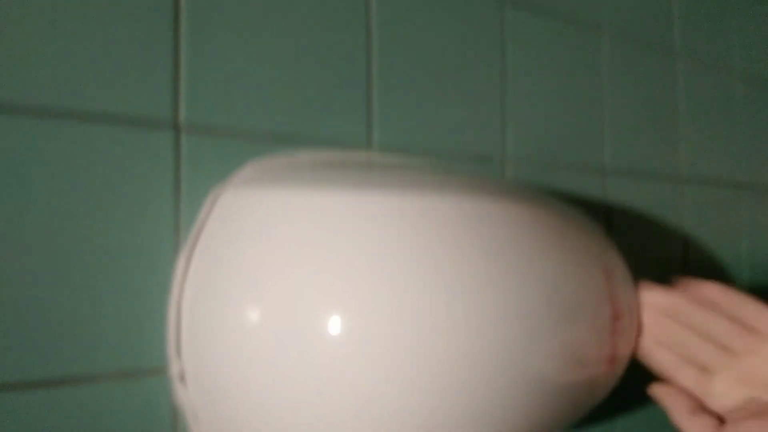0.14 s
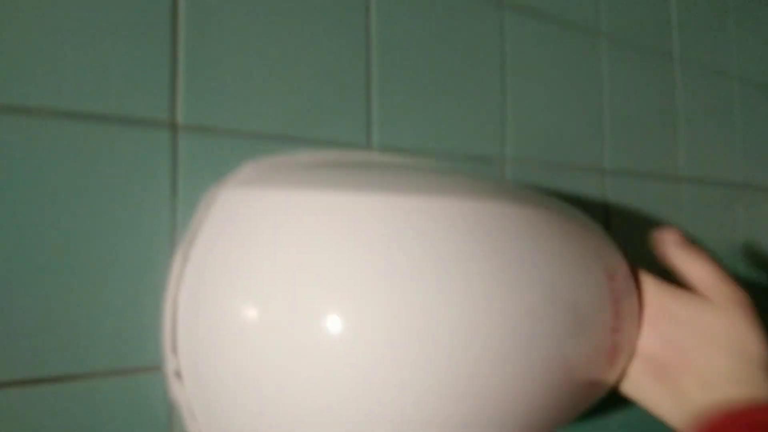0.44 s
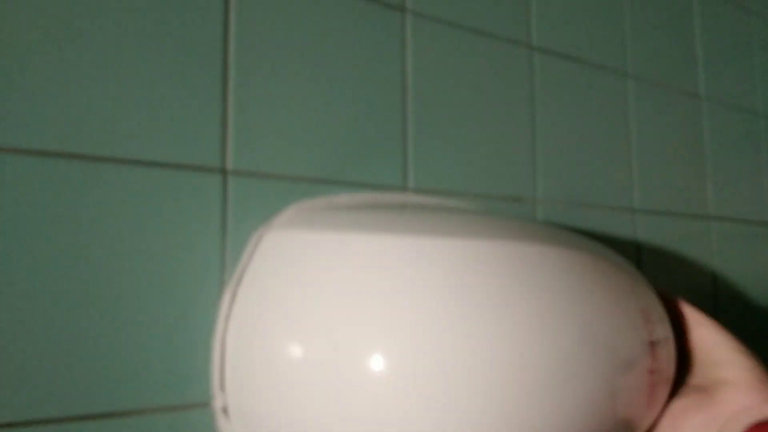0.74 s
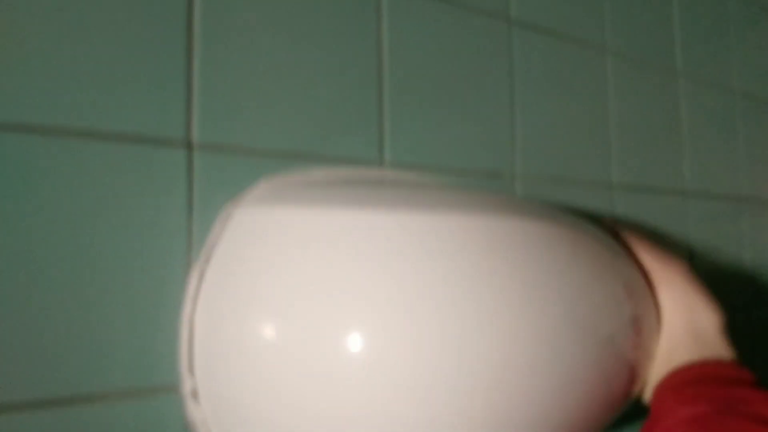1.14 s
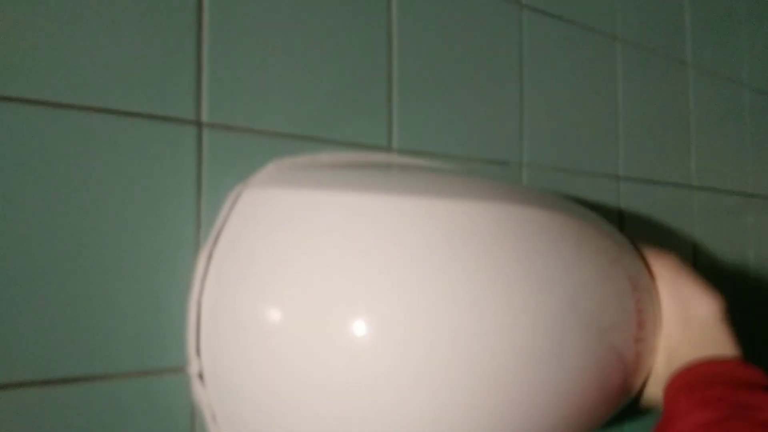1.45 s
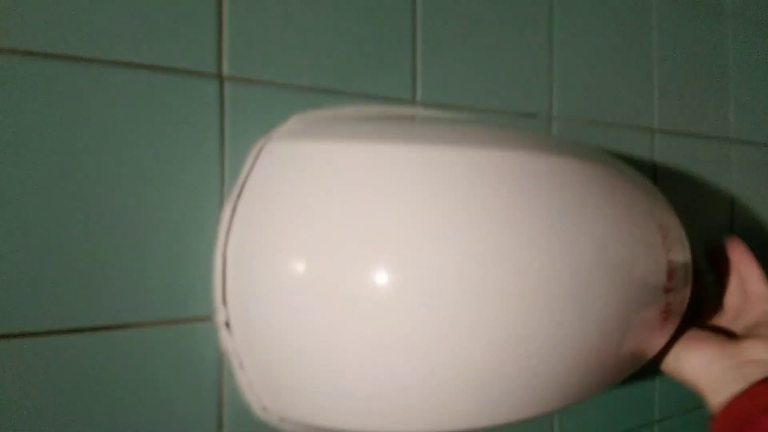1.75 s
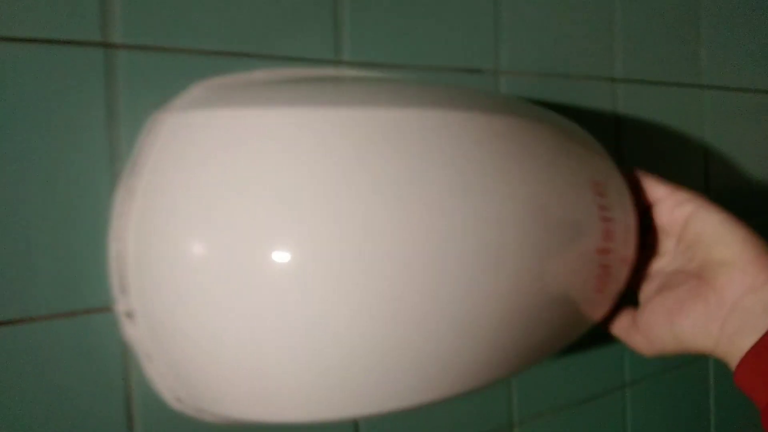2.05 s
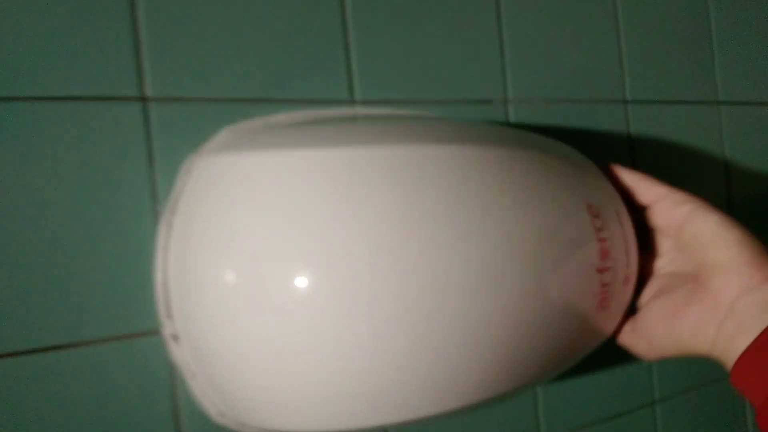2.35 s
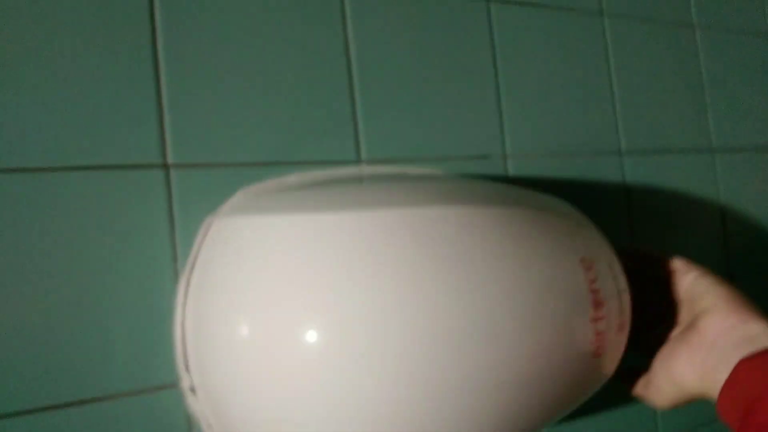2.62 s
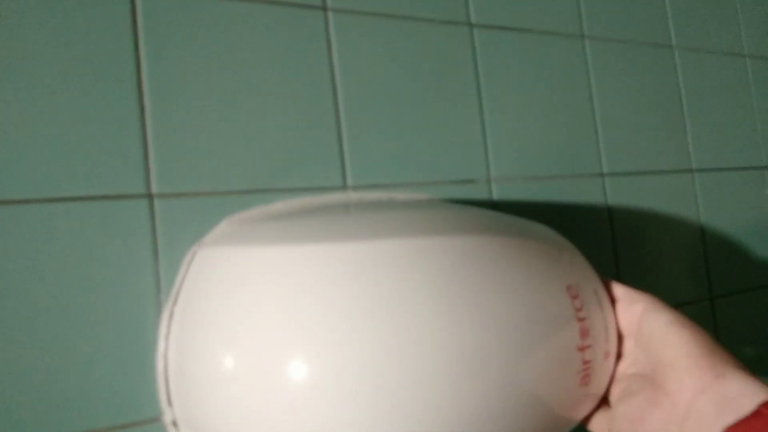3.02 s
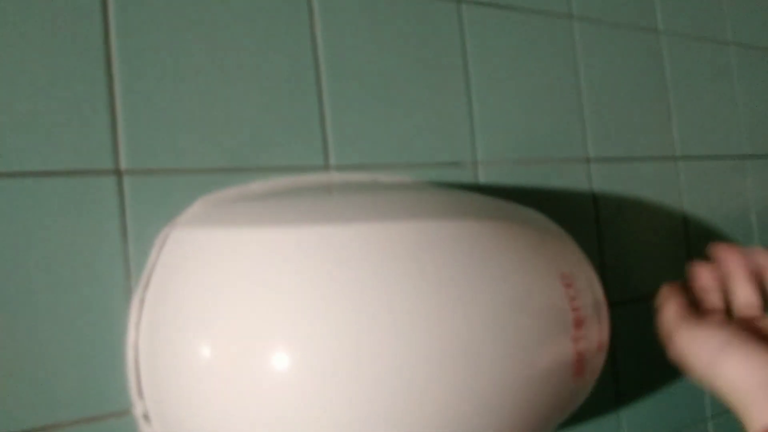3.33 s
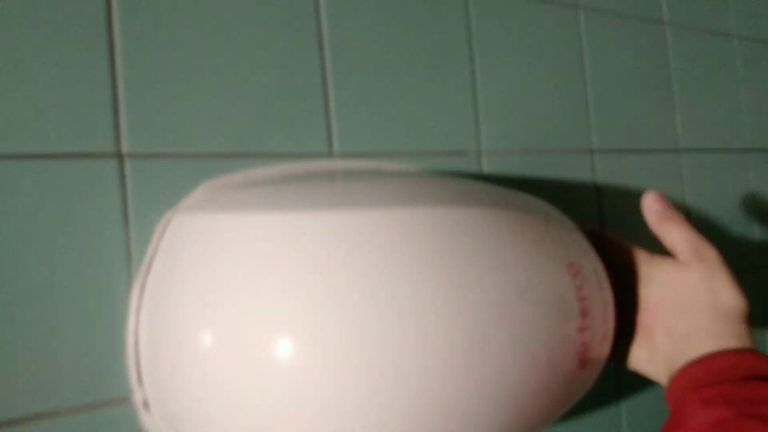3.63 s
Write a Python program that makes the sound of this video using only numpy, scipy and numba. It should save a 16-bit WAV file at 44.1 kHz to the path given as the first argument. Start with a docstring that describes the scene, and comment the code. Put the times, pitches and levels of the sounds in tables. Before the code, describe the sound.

Hand dryer already at full speed, heard close up in a reverberant tiled room. Air hisses sharply on skin, drops back, then roars in the palm, over a steady piercing whine and occasional gust bumps.

```python
"""Hand dryer in a tiled washroom

A high-speed hand dryer runs while a hand moves about in its jet.
The jet is shaped noise that rushes throughout; the motor is a stack of whining tones on one shaft speed.
Near the nozzle the air hisses on the skin (bright noise), further off it roars in the palm (resonant noise).
Deflected gusts buffet the microphone, two low tones boom at the start and ring out,
and the recorder rounds the loudest peaks."""
import sys
import numpy as np
from scipy import signal
from scipy.fft import rfft, irfft
from scipy.io import wavfile
from scipy.ndimage import uniform_filter1d
from numba import njit

SR = 44100
rng = np.random.default_rng(int(sys.argv[2]) if len(sys.argv) > 2 else 0)


def waveform_to_disk(signal):
    """Save audio, clipped to [-1, 1], as 16-bit WAV at the path in sys.argv[1]."""
    frames = np.transpose(np.atleast_2d(signal))
    scaled = np.clip(frames, -1, 1) * 32767
    samples = np.round(scaled).astype(np.int16)
    wavfile.write(sys.argv[1], SR, samples)


N = 166698  # samples


def undb(db):
    """Decibels to gain."""
    return 10 ** (np.asarray(db) / 20)


def unit(x):
    """Scale to rms 1."""
    return x / np.sqrt(np.mean(x ** 2))


def curve(rows, axis=1):
    """One column of a table, joined by straight lines in time."""
    rows = np.array(rows)
    return np.interp(np.arange(N) / SR, rows[:, 0], rows[:, axis])


def walk(rate):
    """Smooth random motion of rms 1, from about `rate` fresh values per second."""
    hold = int(SR / rate)
    steps = np.repeat(rng.standard_normal(N // hold + 1), hold)
    smooth = uniform_filter1d(uniform_filter1d(steps, hold), hold)
    return unit(smooth[:N])


def noise(colour):
    """Noise of rms 1 whose spectrum joins the table's points over log frequency."""
    hz, db = np.array(colour).T
    f = np.maximum(np.fft.rfftfreq(N, 1 / SR), 1)
    gain = undb(np.interp(np.log(f), np.log(hz), db))
    return unit(irfft(rfft(rng.standard_normal(N)) * gain, N))


def contact(db, onset_db):
    """Gain of a hand sound: its power above the onset level, silent below it."""
    return np.sqrt(np.maximum(undb(db) ** 2 - undb(onset_db) ** 2, 0))


def jet():
    """The free jet: steady turbulence, heard as a broad rush."""
    # jet spectrum: pitch_hz [Hz], density_db [dB per Hz, relative]
    jet_colour = [(25, -3), (80, -10), (130, 0), (300, 1.5), (470, -4), (620, 0.5), (1000, -4), (1800, -10),
                  (4200, -8), (6800, -4), (8400, -8), (10000, -12), (13000, -20), (16000, -21)]
    return undb(-22) * noise(jet_colour)


def skin():
    """The jet breaks on the hand in a hiss that grows brighter as it grows louder."""
    # hiss on the skin: time_s [s], level_db [dB, before onset and trim]
    skin_hiss = [(0.0, -10.5), (0.09, -12), (0.19, -23), (0.31, -23), (0.37, -21.5), (0.41, -8.5),
                 (0.46, -8.5), (0.59, -13.5), (0.61, -17), (0.74, -23.5), (0.84, -13), (1.0, -24.5),
                 (1.07, -12.5), (1.13, -15), (1.17, -9), (1.35, -9.5), (1.36, -8), (1.66, -10.5),
                 (1.78, -22.5), (1.84, -22.5), (2.07, -17.5), (2.17, -23), (2.33, -23), (2.4, -13.5),
                 (2.44, -12.5), (2.54, -17.5), (2.58, -23), (2.81, -24.5), (2.94, -18.5), (2.99, -12.5),
                 (3.17, -11), (3.23, -20), (3.43, -23.5), (3.57, -24), (3.78, -18.5)]
    # hiss spectrum: pitch_hz [Hz], density_db [dB per Hz, relative]
    skin_colour = [(40, -13), (150, -13.5), (700, -12), (1500, -12.5), (2800, -11.5), (4300, -5),
                   (5600, -3), (6800, 0), (7800, -1), (9300, -8.5), (13000, -16), (16000, -19)]
    onset_db, trim_db = -25, 2.5
    sizzle_edge_hz, sizzle_db = 9000, 1
    force = contact(curve(skin_hiss), onset_db) * undb(trim_db)
    hiss = noise(skin_colour)
    high_pass = signal.butter(2, sizzle_edge_hz, "high", fs=SR, output="sos")
    sizzle = signal.sosfilt(high_pass, noise(skin_colour))
    # the sizzle grows with the square of the force
    return force * (hiss + sizzle * force * undb(sizzle_db))


@njit
def resonate(x, hz, k):
    """State-variable band-pass with a moving centre; k is its width as a share of the centre."""
    y, band, low = np.empty(len(x)), 0., 0.
    for i in range(len(x)):
        g = np.tan(np.pi * hz[i] / SR)
        v = (band + g * (x[i] - low)) / (1 + g * (g + k))
        band, low = 2 * v - band, low + 2 * g * v
        y[i] = k * v
    return y


def palm():
    """Turbulence in the hollow of the hand: one resonance moves with the hand, a lower one stays."""
    # roar in the palm: time_s [s], level_db [dB, before onset and trim], resonance_hz [Hz]
    palm_roar = [(0.0, -18.5, 2100), (0.13, -27.5, 2570), (0.22, -27, 1260), (0.26, -29.5, 1720),
                 (0.33, -27, 1220), (0.4, -15.5, 1830), (0.45, -28, 2890), (0.59, -19.5, 2120),
                 (0.73, -22.5, 1140), (0.85, -13.5, 2800), (0.94, -19, 1660), (1.01, -24, 1622),
                 (1.04, -15, 1900), (1.37, -24.5, 3140), (1.42, -18, 2570), (1.66, -18, 2850),
                 (1.81, -25, 1200), (1.98, -15, 1806), (2.07, -14.5, 1900), (2.24, -23.5, 1200),
                 (2.28, -20.5, 1120), (2.38, -15, 2440), (2.47, -15.5, 2610), (2.55, -14, 2070),
                 (2.62, -24.5, 1404), (2.71, -24.5, 1320), (2.78, -23.5, 926), (2.96, -15.5, 2270),
                 (3.21, -16, 2660), (3.31, -23, 1190), (3.34, -27, 1700), (3.55, -26.5, 1010),
                 (3.63, -19.5, 1340), (3.78, -14, 1860)]
    onset_db, air_db, air_width, air_top_hz = -28, 1, 0.97, 6900
    body_hz, body_width, body_db, body_power = 726.0, 0.48, -16.5, 0.62
    hz = np.clip(curve(palm_roar, axis=2), 300, 6000)
    force = contact(curve(palm_roar), onset_db)
    # dividing by the root of the pitch evens out the power as the band moves
    air = resonate(rng.standard_normal(N), hz, air_width) / np.sqrt(hz)
    air = signal.sosfilt(signal.butter(2, air_top_hz, fs=SR, output="sos"), air)
    body = resonate(rng.standard_normal(N), np.full(N, body_hz), body_width)
    roar = unit(air) * force * undb(air_db)
    # a power below 1 makes the body swing less than the roar
    return roar + unit(body) * force ** body_power * undb(body_db)


def motor():
    """Shaft, blade and commutator tones on one speed; the turbulent air makes the high ones flutter."""
    # motor speed: time_s [s], blade_tone_hz [Hz]
    whine_pitch = [(0, 5028), (.55, 5024), (.85, 5040), (1.5, 5020), (2.1, 5030), (2.75, 5037),
                   (3.15, 5050), (3.5, 5054), (3.78, 5050)]
    # motor tones: order [multiple of the shaft rate], level_db [dB rms, before the level curve]
    orders = [(1, -38.5), (9, -26.5), (12, -42), (18, -35), (22, -54), (24, -45.5), (27, -55)]
    # how loudly the tones reach the microphone: time_s [s], gain_db [dB]
    whine_level = [(0, -3), (.15, 2), (.33, -5), (.5, 0), (.72, -9), (.93, 1.5), (1.25, -1), (1.5, -7),
                   (1.9, 2), (2.25, -5), (2.55, -4), (2.66, 3.5), (2.82, 3.5), (3.1, -5), (3.35, -3),
                   (3.55, 1), (3.78, 5)]
    blades, speed_jitter, jitter_per_s = 9, .0005, 59.6  # jitter as a share of the speed
    waver_db, waver_per_s = 1.2, 11.97
    scatter, scatter_per_s = 0.033, 45  # share of a tone scattered by moving air, per order
    shaft_hz = curve(whine_pitch) / blades * (1 + speed_jitter * walk(jitter_per_s))
    turns = np.cumsum(shaft_hz) / SR
    whine = 0
    for order, db in orders:
        # complex path: the scattered part shifts both level and phase
        path = 1 + scatter * order * (walk(scatter_per_s) + 1j * walk(scatter_per_s))
        tone = np.real(path * np.exp(2j * np.pi * (round(order) * turns + rng.random())))
        whine = whine + undb(db) * unit(tone * undb(waver_db * walk(waver_per_s)))
    return whine * undb(curve(whine_level))


def gusts():
    """Short rumbles where deflected air hits the microphone, each low-passed at its own edge."""
    # gusts: start_s [s], length_s [s, up to the release], level_db [dB], upper_edge_hz [Hz]
    gust_hits = [(0.003, 0.017, -12.5, 170), (0.023, .07, -18, 260), (.398, 0.02, -15.5, 110),
                 (2.235, 0.016, -17.5, 130), (2.269, 0.013, -16.5, 300), (2.346, 0.099, -30.5, 90),
                 (3.071, .014, -8.5, 110), (3.093, .016, -11.5, 250), (3.131, 0.017, -16, 100)]
    # gust spectrum: pitch_hz [Hz], density_db [dB per Hz, relative]
    gust_colour = [(20, -5.5), (50, 1), (110, 0.5), (180, -3), (300, -3), (600, -8.5), (2000, -20)]
    attack_s, release_s = 0.0046, 0.012
    t = np.arange(N) / SR
    buffet = 0
    for start, length, db, edge_hz in gust_hits:
        rise = np.clip((t - start) / attack_s, 0, 1)
        push = rise * np.exp(-np.maximum(t - start - length, 0) / release_s)
        rumble = signal.sosfilt(signal.butter(1, edge_hz, fs=SR, output="sos"), noise(gust_colour))
        eddies = push * rumble
        # give the eddies the energy of their envelope
        buffet = buffet + undb(db) * eddies * np.linalg.norm(push) / np.linalg.norm(eddies)
    return buffet


def boom():
    """Two low sine tones that start near the beginning and die away exponentially."""
    # boom tones: start_s [s], pitch_hz [Hz], level_db [dB, at the start], t60_s [s to fall 60 dB]
    boom_tones = [(.01, 82.4, -21, 0.57), (.052, 294.7, -17, 0.47)]
    t = np.arange(N) / SR
    ring = 0
    for start, hz, db, t60 in boom_tones:
        age = np.maximum(t - start, 0)
        ring = ring + undb(db - 60 * age / t60) * np.sin(2 * np.pi * hz * age)
    return ring


def washroom(x):
    """A few hard reflections from the tiles and a diffuse tail that decays exponentially."""
    t60_s, tail_db, tile_db = 0.57, -8.5, -13  # levels against the direct sound
    t = np.arange(SR) / SR
    tail = rng.standard_normal(SR) * np.exp(-np.log(1000) * t / t60_s) * (t > .008)
    response = undb(tail_db) * tail / np.linalg.norm(tail)
    tiles = (rng.uniform(.002, .018, size=5) * SR).astype(int)
    response[tiles] += undb(tile_db) / 2  # each reflection has half the tile gain
    response[0] = 1  # direct sound
    return signal.fftconvolve(x, response / np.linalg.norm(response))[:N]


def scene():
    """Jet and hand in the room; motor, gusts and boom join dry; both channels alike."""
    flutter_db, flutter_per_s = 1.01, 27
    rush = jet()
    hand = skin() + palm()
    buffet = gusts()
    air = washroom(rush + hand * undb(flutter_db * walk(flutter_per_s)))
    return np.tile(air + motor() + buffet + boom(), (2, 1))


def record(dry, ceiling=0.76):
    """The recorder rounds the peaks towards a ceiling and cuts the top steeply."""
    top_hz = 15800
    held = dry / (1 + (dry / ceiling) ** 6) ** (1 / 6)
    return signal.sosfilt(signal.ellip(12, .1, 80, top_hz, fs=SR, output="sos"), held)


dry = scene()
out = record(dry)
waveform_to_disk(out)
```